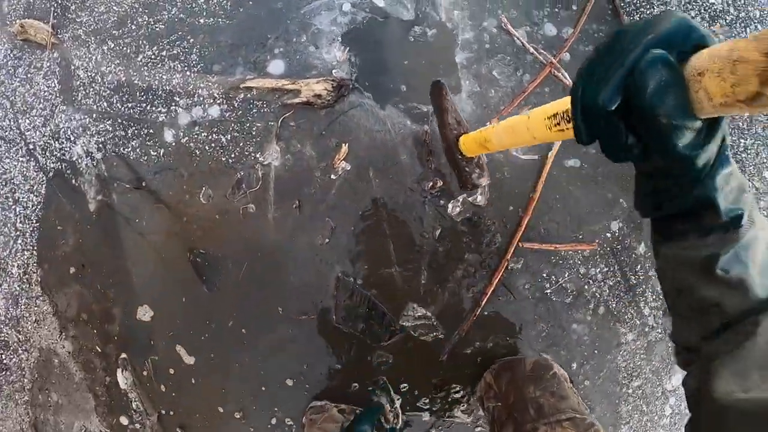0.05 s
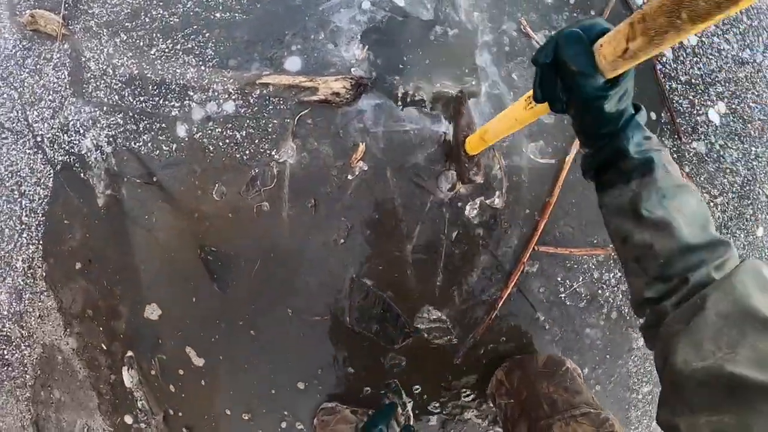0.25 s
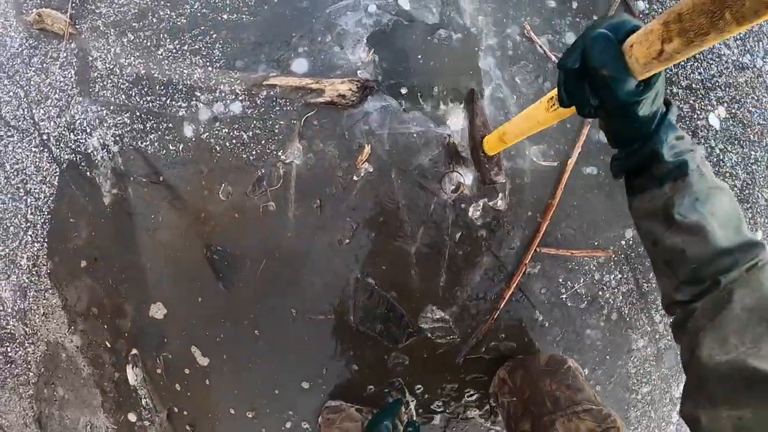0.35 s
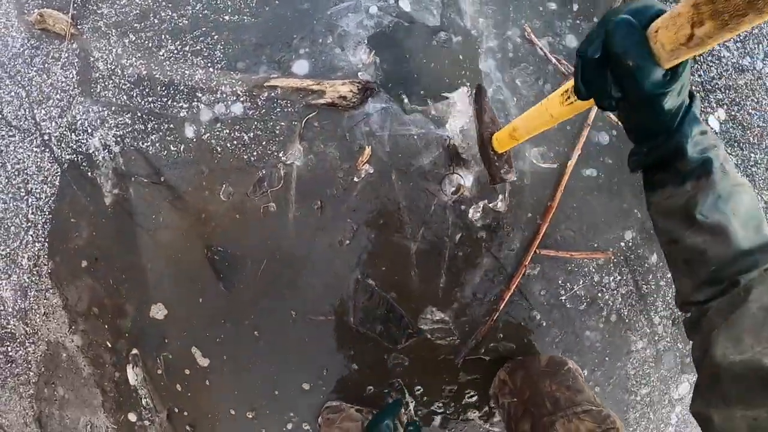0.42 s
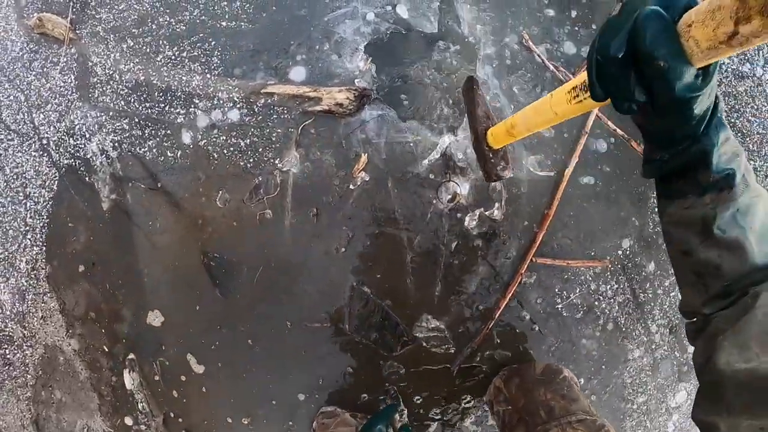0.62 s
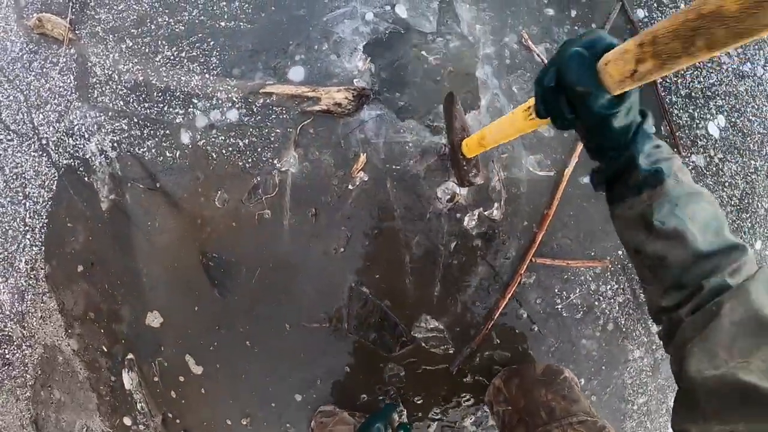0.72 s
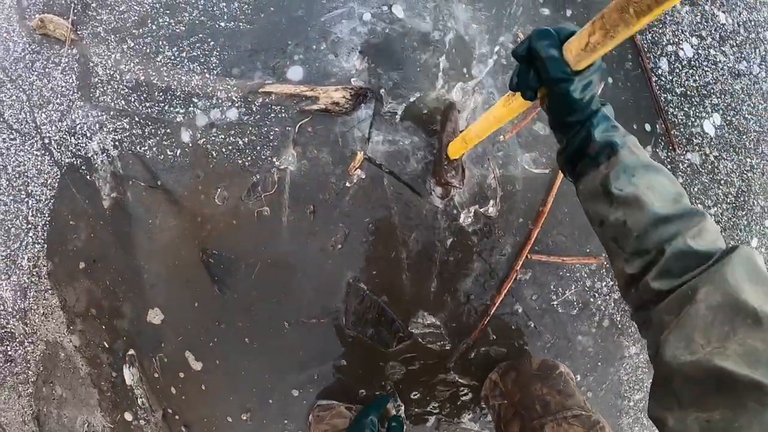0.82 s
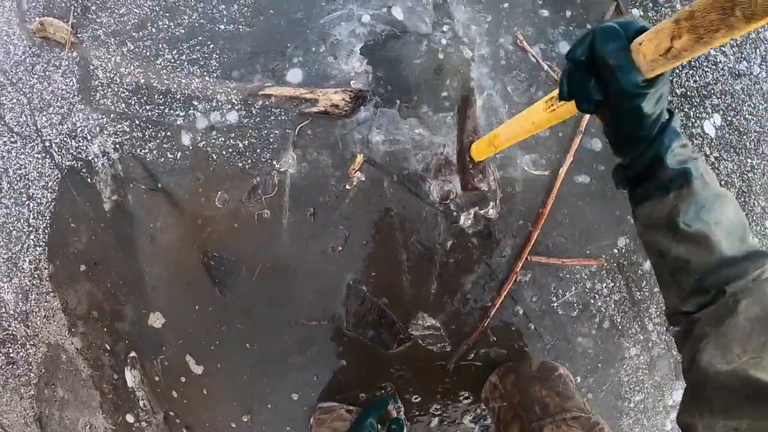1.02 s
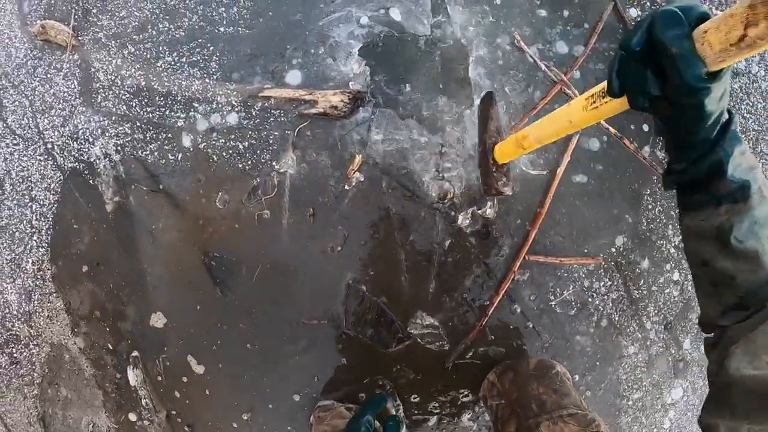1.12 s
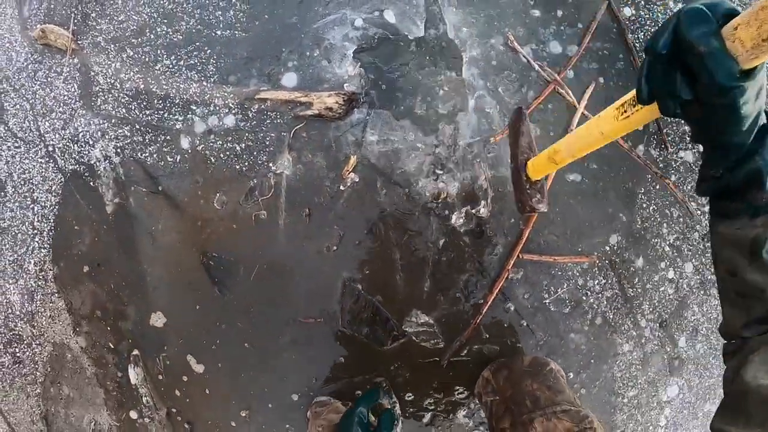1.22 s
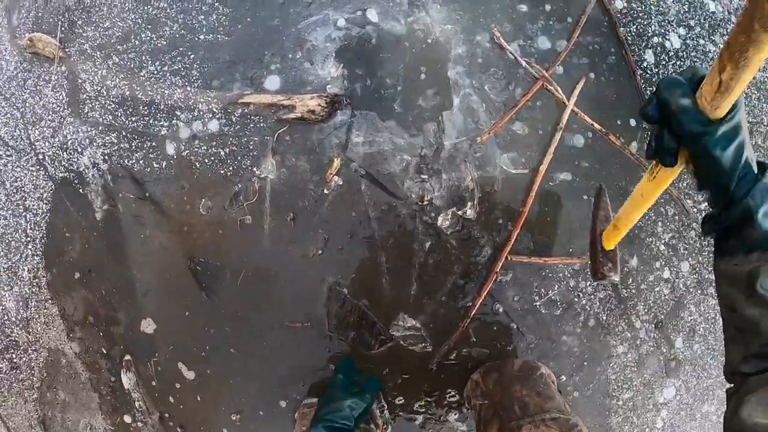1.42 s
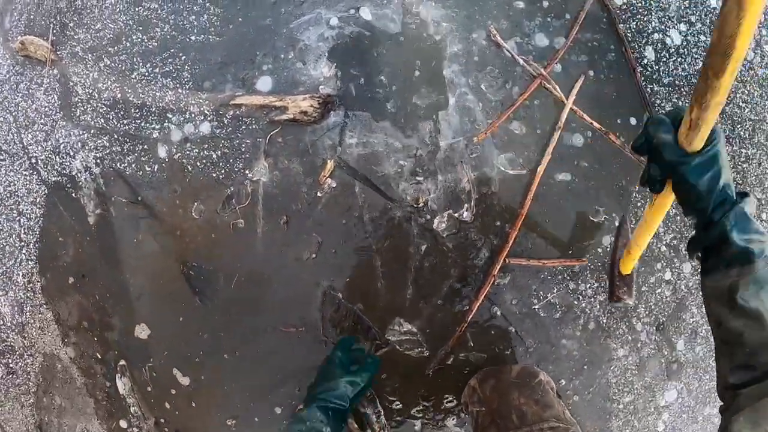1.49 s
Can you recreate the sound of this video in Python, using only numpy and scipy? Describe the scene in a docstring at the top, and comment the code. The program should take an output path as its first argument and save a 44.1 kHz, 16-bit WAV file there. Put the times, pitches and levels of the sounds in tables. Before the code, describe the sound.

Two sharp hatchet blows crack thin ice, followed by faint sloshing and dripping water.

```python
"""A hatchet chops twice into thin, wet pond ice, an arm's length away.
Each blow cracks the ice, rings briefly and makes the sheet thud and heave on the water.
Two bright clinks follow the first chop.
Water washes through the hole, splashes back, bubbles, gurgles and drips on the ice.
A faint bed of outdoor air lies beneath."""
import sys
import numpy as np
from scipy import signal
from scipy.fft import rfft, irfft, next_fast_len
from scipy.io import wavfile
from scipy.ndimage import map_coordinates

SR = 44100
rng = np.random.default_rng(int(sys.argv[2]) if len(sys.argv) > 2 else 0)


def unload_audio(sound):
    """Save the sound as a 16-bit wav file, at the path given as the first command line argument."""
    columns = np.transpose(np.atleast_2d(sound))
    # keep every value between -1 and 1, then stretch to whole-number steps
    steps = np.round(np.clip(columns, -1, 1) * 32767)
    wavfile.write(sys.argv[1], SR, steps.astype(np.int16))


N = 68355

# hatchet blows: t/s, crack/dB, crack hold/s, ring/dB, thud/dB, split delay/s, heave/dB,
# heave t60/s, churn/dB
BLOWS = [(0.2342, -12.5, 0.0049, -16.5, -9.5, 0.004, -12, 0.229, -26.5),
         (0.8207, -8.5, 0.001198, -18.5, -11, 0.001, -12.5, 0.1566, -29.5)]


def blows():
    """Each chop layers a crack and a short ring over the thud, heave and churn of ice on water."""
    out = np.zeros(N)
    for blow, row in enumerate(BLOWS):
        start, crack_db, hold, ring_db, thud_db, delay, heave_db, heave_t60, churn_db = row
        split = start + delay
        out += amp(crack_db) * crack(blow, start, split, hold)
        out += amp(ring_db) * blow_ring(blow, since(start))
        t = since(split)
        out -= amp(thud_db) * thud(blow, t) + amp(heave_db) * heave(t, heave_t60)
        out += amp(churn_db) * churn(t)
    return out


def blow_ring(blow, t):
    """The blow's short ring: hatchet modes plus the ice crack's brief 2 kHz peak."""
    # resonances of the blow: f/Hz, t60/s, first blow/dB, second blow/dB
    resonances = [(798, 0.0654, -7, -40.5), (1050, 0.0477, 0, -7.5), (1331.5, 0.0442, -1.5, -22),
                  (1592.5, 0.0312, 6, -12), (2020, 0.0081, -8, 14.5), (3615, 0.0315, 0, -23.5)]
    return sum(amp(db[blow]) * ring(t, hz, t60, attack=0.00118) for hz, t60, *db in resonances)


def crack(blow, start, split, hold, crumble_db=-19, snap_db=-5):
    """The sheet splits with one snap amid small fractures and a crumbling tail."""
    # crack colour, one curve a blow: f/Hz, gain/dB
    colours = [
        [(300, 8.5), (600, -29), (1100, -14), (1600, 4), (2200, -6), (3400, 1), (4400, -8), (6700, -7),
         (12000, -23), (16000, -63.5)],
        [(420, -25), (760, -29.5), (1050, -0.5), (2100, 1), (2850, -8.5), (3400, -1), (4650, -6), (7200, -15),
         (11000, -30), (16000, -48.5)],
    ]
    t = since(start)
    envelope = burst(t, hold, t60=0.00978) + amp(crumble_db) * burst(t, 0, t60=0.07)
    snap = amp(snap_db) * unit(signal.unit_impulse(N, round(split * SR)))
    fractures = unit(envelope * rng.standard_normal(N))
    return np.std(envelope) * unit(coloured(snap + fractures, colours[blow]))


def thud(blow, t):
    """The ice sheet's low modes give the hit its body."""
    # sheet modes: f/Hz, t60/s, first blow/dB, second blow/dB
    modes = [(148.6, 0.0652, 1, -5.5), (222.9, 0.037, 6.5, -0.5), (310.2, 0.0506, 0, -1.5),
             (407.5, 0.0258, -15, -2)]
    return sum(amp(db[blow]) * ring(t, hz, t60, attack=0.002054) for hz, t60, *db in modes)


def heave(t, t60, start_hz=202, end_hz=29.34, sag_s=0.00472):
    """The sheet heaves on the water ever more slowly: a fast pitch drop into the sub-bass."""
    cycles = end_hz * t + (start_hz - end_hz) * sag_s * (1 - np.exp(-t / sag_s))
    return np.sin(2 * np.pi * cycles) * burst(t, 0, t60, attack=0.00086)


def churn(t):
    """Water churns under the sheet in a dying rumble."""
    colour = [(40, -1), (240, -2.5), (2000, -52)]  # f/Hz, gain/dB
    return shaped(noise(colour), burst(t, 0, t60=0.298))


def splashes():
    """Thrown water and chips land in short slaps."""
    # slaps: t/s, level/dB, hold/s, centre f/Hz
    slaps = [(0.147, -40.5, 0.00232, 953), (0.317, -40, 0.007, 2700), (0.393, -36.5, 0.02985, 4000),
             (0.398, -38.5, 0.0236, 966), (0.408, -24, 0.00058, 3800), (0.472, -37.5, 0.0018, 990),
             (0.5617, -28, 0.00045, 3360), (0.5661, -29, 0.0041, 3157), (0.867, -40.5, 0.017, 3676),
             (0.971, -40.5, 0.0096, 2840)]
    return sum(amp(db) * shaped(spray(hz), burst(since(start), hold, t60=0.0139))
               for start, db, hold, hz in slaps)


def ticks(count=48, centre_hz=5067, ring_cycles=15.4, min_flight_s=0.056, max_flight_s=0.35):
    """Each blow throws up droplets and chips that tick down at random, the late ones fainter."""
    base_db, late_db, spread_db = -32, -5, 4.5
    out = np.zeros(N + SR)
    t = np.arange(SR // 50) / SR
    for start, *_ in BLOWS:
        for flight, pitch, softness in rng.random((count, 3)):
            hz = centre_hz * 2 ** (2 * pitch - 1)
            db = base_db + late_db * flight - spread_db * np.log(max(softness, .05))
            lands = start + min_flight_s + flight * (max_flight_s - min_flight_s)
            out[int(lands * SR):][:len(t)] += amp(db) * ring(t, hz, ring_cycles / hz, attack=2 / hz)
    return out[:N]


def blips():
    """Short gliding blips: two bright clinks after the first chop, and bubbles."""
    # clinks and bubbles: t/s, f/Hz, level/dB, t60/s, initial glide/(octaves a second)
    cues = [(.3195, 2520, -23, 0.015, 13), (0.3317, 596.8, -20, 0.0497, -1),
            (0.3458, 3208, -29.5, 0.041, -5.5), (.408, 715, -13.5, 0.0244, -15.5),
            (.409, 512.8, -9.5, 0.0165, -14.5), (0.417, 293.5, -20, 0.0323, -3.5),
            (.433, 1590, -28, 0.0366, 9.5), (.437, 205.7, -24.5, 0.0493, -6.5),
            (0.471, 228.6, -23.5, 0.0373, -4), (.492, 575.8, -32.5, 0.0876, 1.5),
            (.634, 1283, -17, 0.01786, 20.5), (.907, 641, -13.5, 0.01425, 11.5),
            (.914, 829, -15, 0.0202, 16.5), (0.924, 777.7, -12.5, 0.0292, 40.5)]
    out = np.zeros(N)
    for start, hz, db, t60, glide in cues:
        t = since(start)
        mean_hz = hz * (1 + np.log(2) * glide * t / 2)
        out += amp(db) * ring(t, mean_hz, t60, attack=0.0033)
    return out


def drips(octaves_per_length=0.761, spatter_db=-7):
    """Each drop hits the wet ice with a tiny upward chirp and a spatter."""
    # drops: t/s, starting f/Hz, level/dB, length/s
    drops = [(0.9816, 6149, -28.5, 0.00251), (1.0425, 3600, -31.5, 0.00172), (1.1286, 3500, -37, 0.00176),
             (1.1888, 3200, -38, 0.00668), (1.3139, 3292, -27.5, 0.001854), (1.376, 4815, -35, 0.00112),
             (1.397, 2280, -37, 0.01005), (1.4733, 3736, -32, 0.00413), (1.497, 4133, -25.5, 0.00116)]
    out = np.zeros(N)
    for start, hz, db, length in drops:
        t = since(start)
        sweep_hz = hz * 2 ** (octaves_per_length * np.minimum(t / length, 2))
        chirp = np.sin(2 * np.pi * np.cumsum(sweep_hz) / SR) * burst(t, length / 2, t60=2 * length)
        spatter = shaped(spray(2 * hz), burst(t, length / 2, t60=0.0152))
        out += amp(db) * (chirp + amp(spatter_db) * spatter)
    return out


def gurgle(rough_rad=0.476, flutter_db=3.0):
    """An air pocket shrinks as it fills with water, and its rough tone glides upward."""
    # pocket's glide: t/s, f/Hz, level/dB
    glide = [(1.415, 353.6, -44), (1.454, 506.2, -46.5), (1.473, 834, -51), (1.481, 1068, -37),
             (1.492, 1500, -53)]
    hz, db = curves(glide)
    gate = (since(glide[0][0]) > 0) & (since(glide[-1][0]) == 0)
    envelope = gate * amp(db + flutter_db * wobble(270))
    return envelope * np.sin(2 * np.pi * np.cumsum(hz) / SR + rough_rad * wobble(300))


def hiss(grain_db=2.5):
    """Water and slush run over the ice with a grainy hiss."""
    # hiss fader: t/s, level/dB
    fader = [(0, -48), (.08, -46), (.115, -57.5), (.21, -52), (.26, -47), (.42, -48.5), (.545, -62),
             (.6, -49), (.665, -39.5), (.88, -45.5), (1.11, -45.5), (1.23, -52.5), (1.35, -54.5),
             (1.55, -46.5)]
    # hiss colour: f/Hz, gain/dB
    colour = [(300, -10), (750, -8), (1350, -0.5), (2100, 3), (3800, -2.5), (8000, -11.5), (10000, -23.5),
              (13500, -25.5), (16000, -76)]
    return amp(curves(fader)[0]) * unit(noise(colour) * amp(grain_db * wobble(500)))


def slosh(grain_db=4.5):
    """Water moves in the hole with a low, lumpy slosh."""
    # slosh fader: t/s, level/dB
    fader = [(.085, -43.5), (.115, -54.5), (.2, -53), (.255, -37.5), (.32, -52.5), (.46, -49), (.54, -55),
             (.81, -49), (.87, -36), (.96, -44.5), (1.11, -42.5), (1.18, -59), (1.3, -66), (1.37, -55),
             (1.55, -51.5)]
    # slosh colour: f/Hz, gain/dB
    colour = [(60, -14), (350, 0), (650, -3.5), (1000, -0.5), (1600, -4), (8000, -40.5)]
    return amp(curves(fader)[0]) * unit(noise(colour) * amp(grain_db * np.tanh(wobble(120))))


def air(level_db=-55):
    """Outdoor air lays down a faint, steady rumble."""
    # air colour: f/Hz, gain/dB
    colour = [(20, -9.5), (65, -1.5), (140, -3.5), (300, -17), (700, -41.5), (16000, -50.5)]
    return amp(level_db) * noise(colour)


def place(x, tail_t60=.035, left_lag_s=.00004):
    """The hole lies a little to the right; ice and clothing scatter a very short tail."""
    # nearby reflections: f/Hz, level/dB
    reflections = [(150, -30), (1000, -17), (10000, -8)]
    # stereo balance: f/Hz, left minus right/dB
    balance = [(100, 0), (600, -1.3), (2500, -.6), (7000, -3.5), (12000, -10)]
    tail = rng.standard_normal((2, SR // 8)) * fade(np.arange(SR // 8) / SR, tail_t60)
    tail /= np.linalg.norm(tail, axis=1, keepdims=True)
    scatter = signal.fftconvolve(x[None], tail, axes=1)[:, :N]
    scatter = filtered(scatter, lambda hz: amp(along(reflections, hz)))
    sides = np.array([[.5], [-.5]])

    def pan(hz):
        return amp(sides * along(balance, hz)) * np.exp(-2j * np.pi * hz * sides * left_lag_s)
    return filtered(x + scatter, pan)


def amp(db):
    """Decibels to gain."""
    return 10 ** (np.asarray(db) / 20)


def unit(x):
    """Scale to rms 1."""
    return x / np.sqrt(np.mean(x ** 2) + 1e-20)


def along(points, hz):
    """Read a (Hz, value) curve on a log frequency axis."""
    freqs, values = np.transpose(points)
    return np.interp(np.log(hz + 1), np.log(freqs + 1), values)


def curves(rows):
    """One automation curve for each column after the time."""
    times, *columns = np.transpose(rows)
    return [np.interp(np.arange(N) / SR, times, column) for column in columns]


def since(start):
    """Seconds since start, zero before it."""
    return np.maximum(np.arange(N) / SR - start, 0)


def wobble(rate):
    """A smooth random curve, rate knots a second."""
    return map_coordinates(rng.standard_normal(int(N * rate / SR) + 4), [np.arange(N) * rate / SR])


def filtered(x, response):
    """x through a complex frequency response."""
    size = next_fast_len(N + SR // 2)
    return irfft(rfft(x, size) * response(np.fft.rfftfreq(size, 1 / SR)), size)[..., :N]


def coloured(x, spectrum):
    """x through a minimum-phase EQ with these (Hz, dB) gains."""
    def response(hz):
        cepstrum = irfft(np.log(amp(along(spectrum, hz))))
        causal = 1 + np.sign(np.fft.fftfreq(len(cepstrum)))
        return np.exp(rfft(cepstrum * causal))
    return filtered(x, response)


def noise(spectrum):
    """Coloured noise of rms 1."""
    return unit(filtered(rng.standard_normal(N), lambda hz: amp(along(spectrum, hz))))


def spray(hz, q=2.43, top_hz=7930, grain_db=4):
    """Grainy noise around hz, dull at the very top, rms 1."""
    def band(f):
        damping = 1j * f * hz / q
        return damping / (hz ** 2 - f ** 2 + damping) / (1 + (f / top_hz) ** 4)
    return unit(filtered(rng.standard_normal(N) * amp(grain_db * wobble(2000)), band))


def fade(t, t60):
    """Exponential decay, 60 dB in t60."""
    return np.exp(-np.log(1000) * t / t60)


def burst(t, hold, t60, attack=.0003):
    """Envelope: fast attack, hold, release."""
    return (1 - np.exp(-t / attack)) * fade(np.maximum(t - hold, 0), t60)


def ring(t, hz, t60, attack):
    """One damped mode."""
    return np.sin(2 * np.pi * hz * t) * burst(t, 0, t60, attack)


def shaped(x, envelope):
    """Noise under an envelope, with the energy of that envelope."""
    return unit(x * envelope) * np.sqrt(np.mean(envelope ** 2))


def scene(wide_db=-9):
    """Blows and water over quiet outdoor air, with a softer layer of hiss from all around."""
    hole = blows() + splashes() + ticks() + blips() + drips() + gurgle() + hiss() + slosh()
    return place(hole + air()) + amp(wide_db) * np.array([hiss(), hiss()])


def record(dry):
    """A soft clip rounds the highest peaks; a steep low-pass trims the very top."""
    top_hz = 16200
    rounded = dry / (1 + np.abs(dry) ** 6) ** (1 / 6)
    return filtered(rounded, lambda hz: hz < top_hz)


dry = scene()
out = record(dry)
unload_audio(out)
```